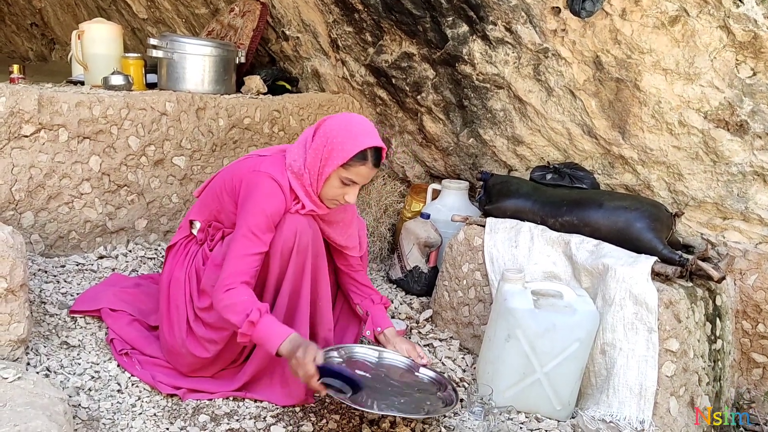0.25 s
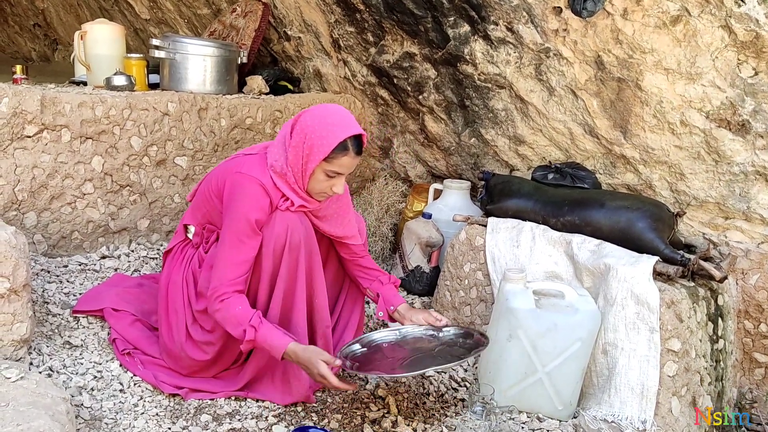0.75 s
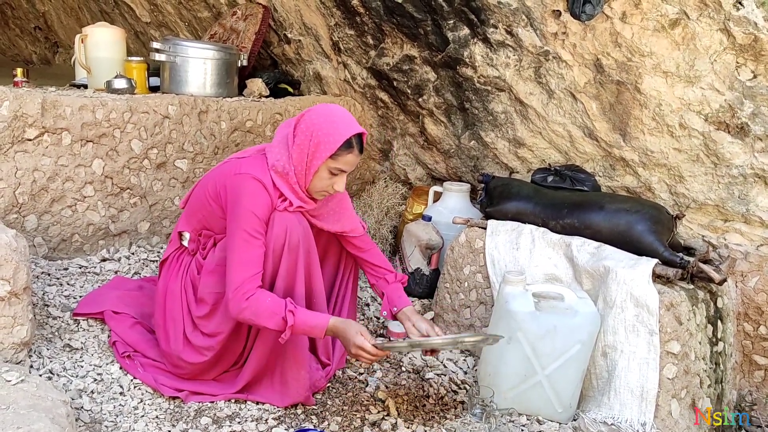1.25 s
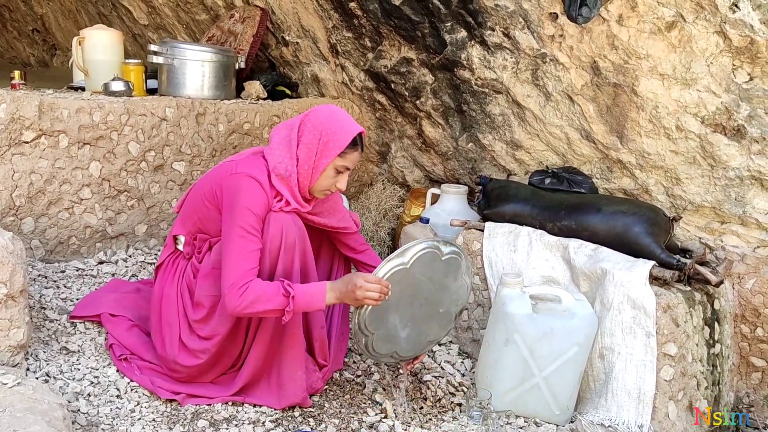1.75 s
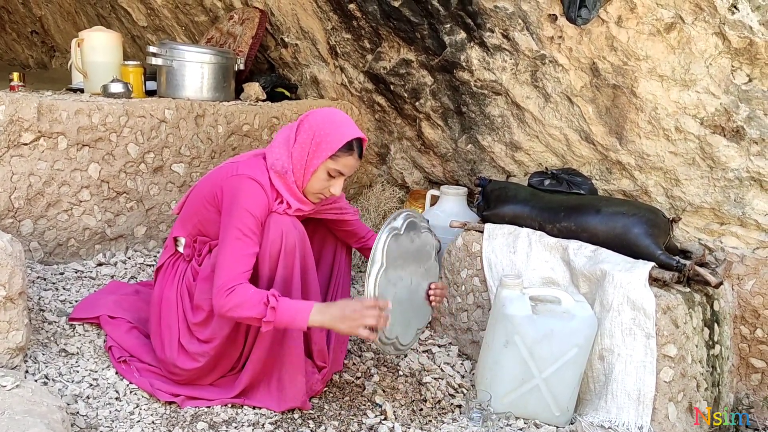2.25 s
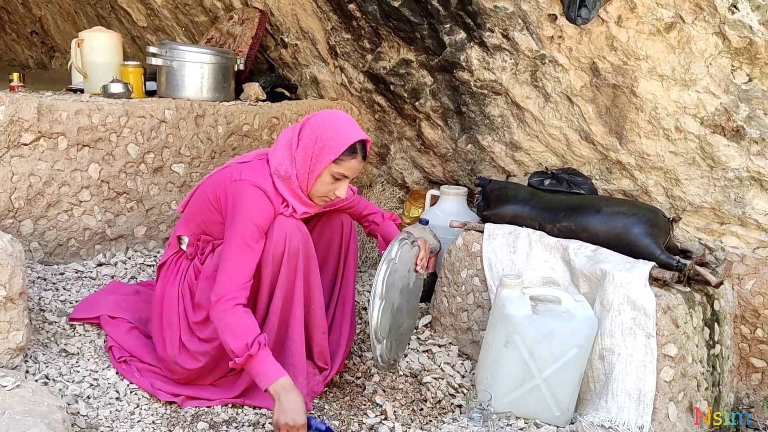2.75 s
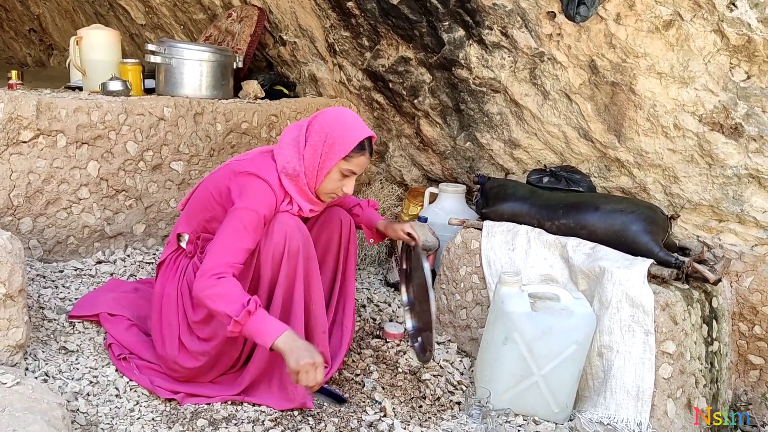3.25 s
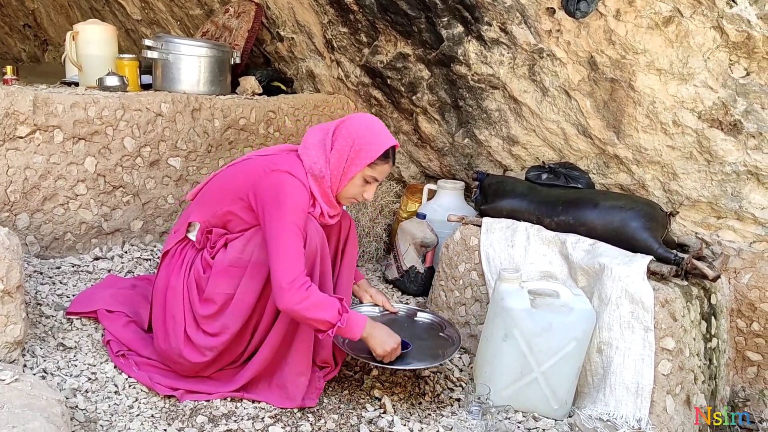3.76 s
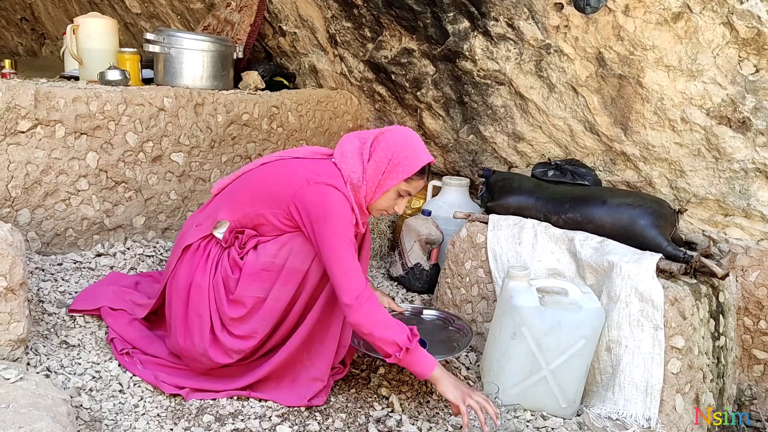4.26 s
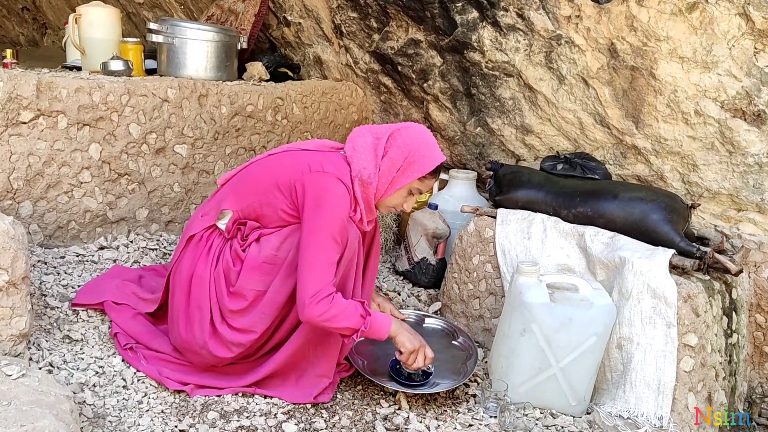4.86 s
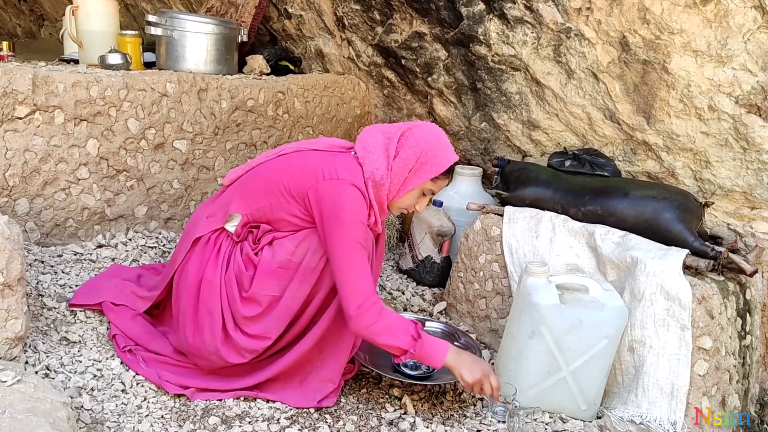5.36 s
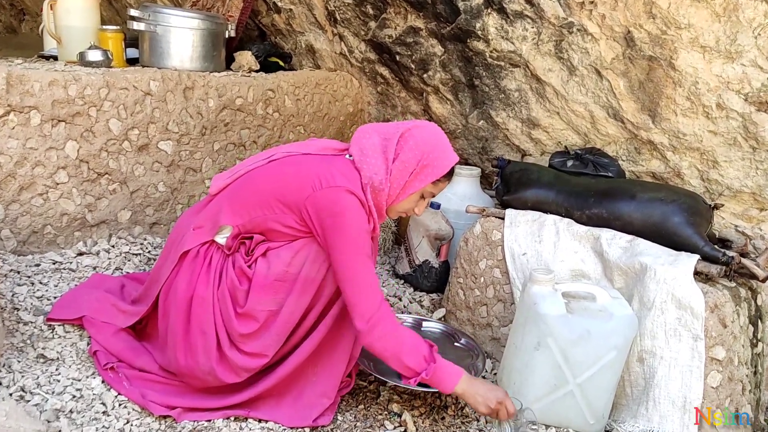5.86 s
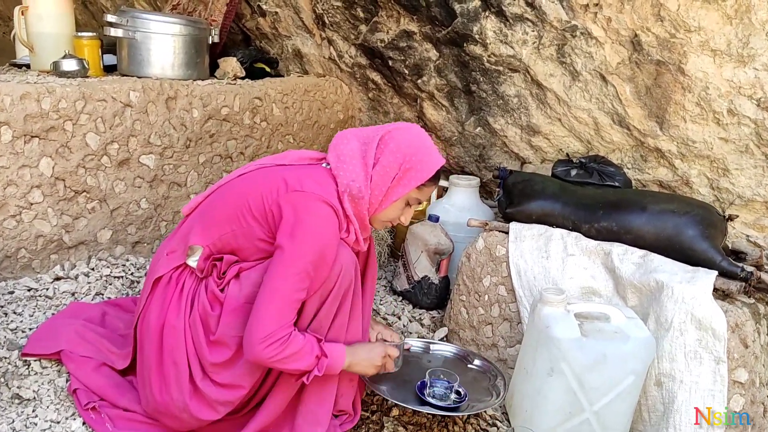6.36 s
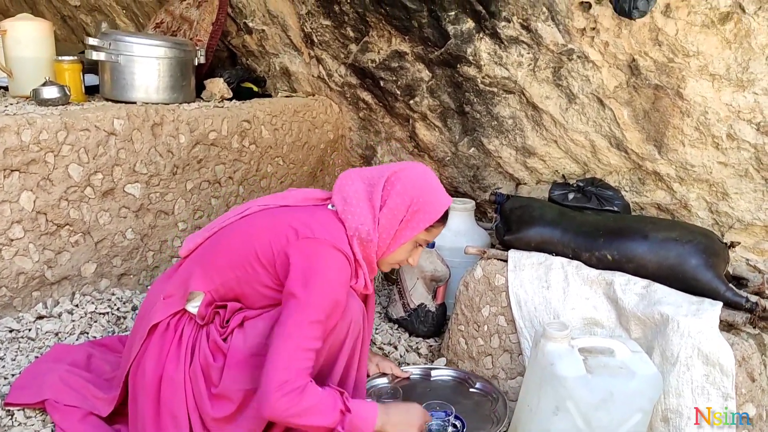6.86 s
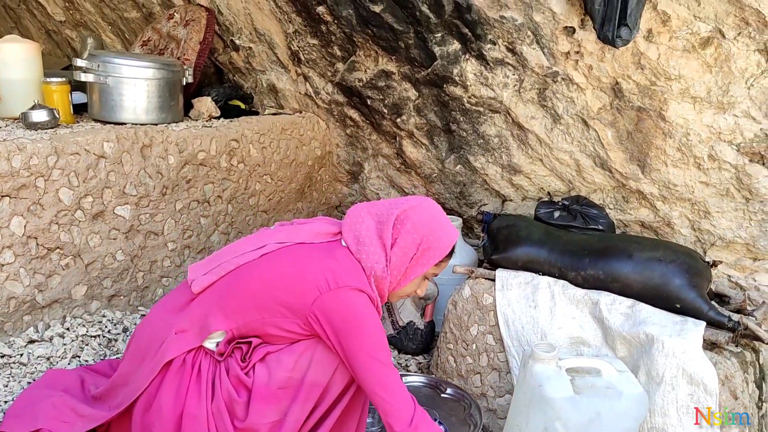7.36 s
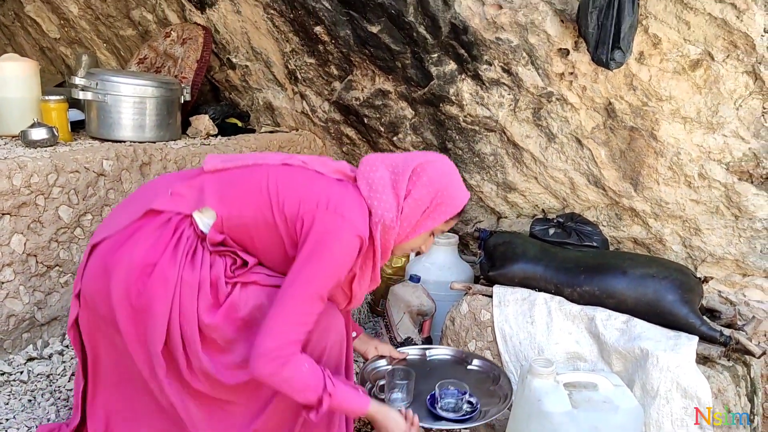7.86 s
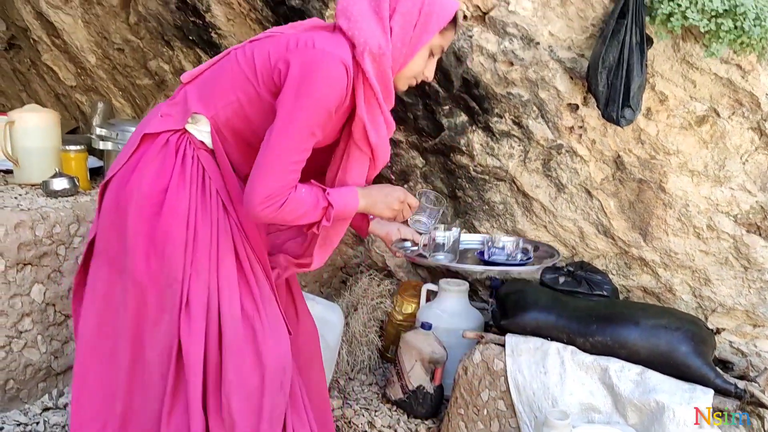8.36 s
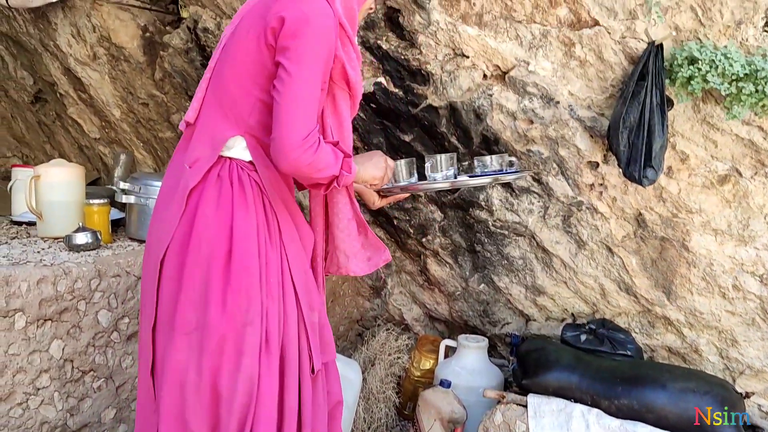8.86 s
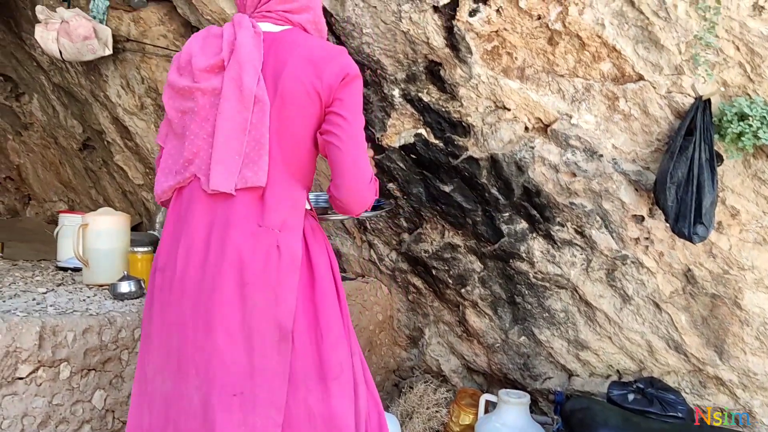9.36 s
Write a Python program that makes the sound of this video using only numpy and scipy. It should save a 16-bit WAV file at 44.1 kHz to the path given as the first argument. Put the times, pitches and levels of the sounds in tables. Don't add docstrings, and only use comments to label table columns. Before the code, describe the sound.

Close stereo microphone outdoors beneath a rock overhang. A saucer scrapes lightly on a thin steel tray, then rinse water patters onto stones. The tray clashes down with a quick rattle, a saucer lands loudly and rings, glasses clink down, gravel crunches underfoot, and the loaded tray jolts as it is lifted. Soft wind and cloth rustle persist underneath.

```python
import sys
import numpy as np
from scipy import signal
from scipy.fft import rfft, irfft, next_fast_len
from scipy.io import wavfile

SR = 44100
rng = np.random.default_rng(int(sys.argv[2]) if len(sys.argv) > 2 else 0)


def output_pcm(signal):
    pcm = np.clip(np.atleast_2d(signal).T, -1, 1) * 32767
    wavfile.write(sys.argv[1], SR, np.round(pcm).astype(np.int16))


def voltage_ratio(decibels):
    exponent = np.asarray(decibels, float) / 20
    return 10 ** exponent


N = 423779
TIME = np.arange(N) / SR
SIDES = np.array([[.5], [-.5]])


def rms_one(x):
    return x / np.sqrt(np.mean(x ** 2) + 1e-20)


def at_hz(points, hz):
    table_hz, values = np.array(points).T
    return np.interp(np.log(hz), np.log(table_hz), values)


def band(x, low_hz, high_hz):
    sos = signal.butter(2, [low_hz, min(high_hz, .45 * SR)], "band", fs=SR, output="sos")
    return signal.sosfilt(sos, x)


def drift(rate, db=None, at=TIME):
    r = np.exp(-80 * np.pi * rate / SR)
    noise = rng.standard_normal(N // 40 + 2002)
    slow = rms_one(signal.lfilter([1], [1, -2 * r, r * r], noise)[2000:])
    values = slow if db is None else voltage_ratio(db * slow)
    return np.interp(at * (SR / 40), np.arange(len(slow)), values)


def grit(share, spread_db):
    sizes = voltage_ratio(spread_db * np.minimum(rng.exponential(1, N), 5)) * (rng.random(N) < share)
    return rms_one(rng.standard_normal((2, N)) * (sizes + 0.56))


def coloured(source, spectrum, patchy_db, likeness):
    size = next_fast_len(N)
    hz = np.arange(size // 2 + 1) * SR / size + 1e-3
    inside = (hz > spectrum[0][0]) * (hz < spectrum[-1][0])
    mid, side = rfft(source.astype(np.float32), size) * (voltage_ratio(at_hz(spectrum, hz)) * inside)
    alike = np.clip(at_hz(likeness, hz), 0, 1)
    pair = np.sqrt(1 + alike) * mid + np.sqrt(1 - alike) * side * [[1], [-1]]
    pair = pair.astype(np.complex64)
    place = (np.log(np.maximum(hz, 120) / 120) / np.log(2.7)).astype(np.float32)
    out = 0
    for centre in range(6):
        part = pair * np.clip(1 - np.abs(place - centre), 0, 1)
        flicker = drift(9, db=patchy_db)
        if part.any():
            out = out + flicker * irfft(part, size)[:, :N]
    return rms_one(out)


def add(out, start_s, sound):
    i = round(start_s * SR)
    out[:, i:i + sound.shape[1]] += sound[:, :N - i]


# frequency in Hz, level in dB per Hz
AIR_COLOUR = [(7.1, -20), (12, 14), (28, -9.5), (59, -13), (128, -19), (342, -24.5), (1460, -30),
              (14900, -41.5)]
# frequency in Hz, left-right likeness
AIR_LIKENESS = [(60, -0.15), (240, 0.87), (930, 0.087), (3660, -0.58), (14400, -0.25)]
# time in seconds, level in dB
GUSTS = [(0, 5), (2.4, 4.5), (4.5, 5.5), (6.3, 6), (7.8, 5.5), (9.6, 8)]


def air():
    still = coloured(rng.standard_normal((2, N)), AIR_COLOUR, patchy_db=2.4, likeness=AIR_LIKENESS)
    wind = signal.lfilter(*signal.butter(1, 110, fs=SR), still)
    gust = voltage_ratio(np.interp(TIME, *np.transpose(GUSTS)))
    return voltage_ratio(-54.5) * (still - wind + gust * wind)


def moves(rows):
    t = TIME[::32]
    power = 0
    for peak_s, db, swell_s, fade_s in rows:
        swings = np.where(t < peak_s, (peak_s - t) / swell_s, (t - peak_s) / fade_s)
        power = power + voltage_ratio(2 * (db - 20 * swings))
    return np.interp(TIME, t, power)


def out_of_step(x):
    turn_hz, alike, hollow = 1800, 0.22, 0.685
    turn = np.tan(np.pi * turn_hz / SR)
    turn = (turn - 1) / (turn + 1)
    x = x - hollow * signal.lfilter(*signal.butter(1, [2900, 3900], "band", fs=SR), x)
    left = signal.lfilter([0, turn, 1], [1, turn], x[0])
    right = alike * x[0] + np.sqrt(1 - alike ** 2) * x[1]
    return np.array([left, right])


# peak in seconds, peak level in dB, swell in seconds per 20 dB, fade in seconds per 20 dB
HANDS = [(.106, -50.5, 0.26, 0.11), (.392, -54, 0.8, 0.2), (.91, -60.5, 0.026, 0.32),
         (2.5, -60.5, 0.031, 1.2), (2.69, -56, 0.28, 0.03), (2.885, -60.5, 0.054, 0.21),
         (3.11, -56, 0.031, 0.11), (3.19, -55.5, 0.1, 0.61), (3.7, -59, 0.74, 9.2),
         (4.404, -55, 0.033, 0.11), (4.62, -58, 0.063, 1.4), (5.62, -55, 1.3, 0.23),
         (5.858, -52, 0.0085, 0.029), (6.27, -75.5, .8, .6), (6.5, -61.5, 0.26, 0.049),
         (7.33, -59, 0.38, 0.33), (7.92, -58, 1.2, 0.36)]
WATER = [
    (1.575, -51.5, 0.049, 0.97),
    (1.72, -43.5, 0.14, 0.24),
    (2.04, -54, 0.016, 0.069),
    (2.33, -65.5, 3, 0.15),
    (2.4, -69, 0.093, .2),
]
FEET = [(7.016, -51.5, 0.098, 1.1), (7.468, -42.5, 0.048, 0.35), (7.708, -41.5, 0.064, 0.062),
        (7.78, -71.5, 0.034, 2.32), (8.3, -45.5, 0.022, 0.15), (8.365, -45.5, 0.068, 0.29),
        (8.46, -57, 0.2, 0.033), (8.6, -75, 0.17, 0.13), (8.888, -57.5, 0.15, 0.14),
        (9.147, -56.5, 0.055, 0.078), (9.25, -57.5, .1, 0.097), (9.3, -66, 0.28, 1.2),
        (9.33, -67, 0.75, 0.15)]
SLOSH = [
    (4.55, -51, 0.012, 0.022),
    (4.71, -54.5, 0.21, 0.13),
    (4.93, -58, 0.24, 0.43),
    (5.4, -61, 0.58, 0.29),
    (6.08, -63, 0.79, 1.6),
    (6.47, -57.5, 0.16, 0.046),
    (8.92, -60, 0.33, 0.091),
    (9.43, -62, 0.43, 0.084),
]
# time in seconds, left-right in dB
PLACE = [(0.0, 3.5), (1.15, 0.5), (1.55, -2.5), (3.15, 3.5), (4.73, 0), (6.42, 0.5), (7.51, 2), (9.6, 1.5)]
# frequency in Hz, level in dB per Hz
HISS = [(1180, -24.5), (2000, -2), (2580, -2.5), (3390, -4), (4830, -1.5), (7100, -0.5), (8100, 0.5),
        (9550, -1.5), (14800, -14)]
# frequency in Hz, left-right likeness
LIKENESS = [(60, 0.33), (180, 0.65), (540, 0.43), (1610, 0.066), (4810, 0.05), (14400, 0.048)]


def rustle():
    hands, water, feet = moves(HANDS), moves(WATER), moves(FEET)
    crunch_power = hands * voltage_ratio(2 * -11.5) + water * voltage_ratio(2 * -15.5) + feet * voltage_ratio(2 * -14)
    body_power = hands * voltage_ratio(2 * -15.5) + water * voltage_ratio(2 * -48) + feet * voltage_ratio(2 * -16)
    body_power = body_power + voltage_ratio(2 * -73)

    hiss = coloured(grit(0.33, spread_db=1.2), HISS, patchy_db=1.45, likeness=LIKENESS)
    crunch = coloured(grit(0.011, spread_db=3.5),
                      [(450, -28.0), (800, -1.5), (1100, -0.2), (2400, -5.5), (3300, -14.5)],
                      patchy_db=2.0, likeness=LIKENESS)
    body = coloured(rng.standard_normal((2, N)), [(90, -25.0), (170, -5.5), (400, -3.5), (800, -16.5)],
                    patchy_db=1.5, likeness=LIKENESS)
    slosh = coloured(rng.standard_normal((2, N)),
                     [(600, -17.5), (850, -5.5), (1050, -10.0), (1400, -13.0), (3600, -24)],
                     patchy_db=3.5, likeness=LIKENESS)

    gravel = np.roll(hiss, SR, axis=1)
    glint = band(gravel, 7400, 10570) * [[0.6], [-1.1]]
    gravel = gravel + voltage_ratio(-6) * glint
    stream = drift(39, db=2) * out_of_step(np.roll(hiss, 2 * SR, axis=1))

    mix = np.sqrt(hands) * hiss + np.sqrt(water) * stream + np.sqrt(feet) * gravel
    mix = mix + np.sqrt(crunch_power) * crunch + np.sqrt(body_power) * body
    mix = mix + np.sqrt(moves(SLOSH)) * slosh
    pan_db = np.interp(TIME, *np.transpose(PLACE))
    return voltage_ratio(3.0 + SIDES * pan_db) * mix


def taps(rows, t60, splash_db, trim_db, width=1.35):
    out, t = np.zeros((2, N)), TIME[:SR // 6]
    for s, db, hz, pan_db in rows:
        puff = rms_one(band(rng.standard_normal((2, SR // 5)), hz / width, hz * width)[:, :len(t)])
        alike = np.clip(1 - hz / 1200, 0, 1) ** .5
        puff[1] += alike * (puff[0] - puff[1])
        shape = voltage_ratio(-60 * t / t60) * (1 - np.exp(-t * hz / 1.1)) ** 2
        ring = np.sin(2 * np.pi * hz * t)
        add(out, s - .0008, voltage_ratio(db + trim_db + SIDES * pan_db) * shape * (ring + voltage_ratio(splash_db) * puff))
    return out


# start in seconds, peak level in dB, centre in Hz, left-right in dB
STEPS = [
    (7.452, -35, 8400, 3),
    (9.133, -48.5, 7090, -2),
    (9.228, -47.5, 8350, -4),
    (9.328, -46.5, 6820, -3),
    (9.393, -50.5, 6500, -4),
]


def steps():
    return taps(STEPS, t60=0.088, splash_db=16.5, trim_db=-16.5)


# start in seconds, peak level in dB, pitch in Hz, left-right in dB
HUMS = [
    (3.862, -30, 251.3, 0),
    (3.965, -35.5, 245.7, 0),
    (5.22, -40, 406, 0),
    (6.60, -33, 165.4, 0),
    (8.66, -37, 380, 1),
]


def hums():
    return taps(HUMS, t60=0.68, splash_db=-29, trim_db=-11.0)


# start in seconds,
# peak level in dB, pitch in Hz, left-right in dB
DROPS_AND_PEBBLES = [(0.5676, -43, 9000, 7), (0.877, -36, 9500, 8), (1.4247, -42, 1270, 12), (1.5487, -32, 2350, -3),
                     (1.581, -27, 5700, -4), (1.7194, -35, 5700, -4), (1.7856, -30, 7660, -10), (1.877, -33, 8850, -1),
                     (1.9043, -30, 10100, 0), (1.9385, -37, 5400, 5), (1.9645, -27.5, 8000, -7),
                     (2.0326, -28.5, 5330, -7), (2.0694, -48, 2150, 0), (2.0857, -46, 2200, -4),
                     (2.2222, -35, 10000, 4), (2.363, -33.5, 4770, -2),
                     (4.303, -34, 1600, -8), (4.439, -32, 2230, -10), (5.57, -33, 6200, 5), (5.593, -46, 9150, 9),
           (5.643, -26.5, 5500, 6), (5.668, -37, 8850, 9), (5.8562, -36.5, 4930, -8),
           (5.926, -32.5, 7060, 2), (5.945, -28, 10000, 6), (5.986, -28, 7550, 4), (6.024, -37, 1280, -7),
           (6.5023, -30.5, 8220, 5), (8.544, -21, 9520, -3.5), (8.564, -27.5, 7800, -3.5),
           (9.0574, -39, 1980, -5), (9.0683, -39.5, 5960, 3), (9.0914, -35.5, 8700, 7),
           (9.12, -34.5, 1840, -2), (9.328, -35, 2130, -10), (9.3937, -32, 1090, 0), (9.422, -26, 1920, -7)]


def drops_and_pebbles():
    return taps(DROPS_AND_PEBBLES, t60=0.01, splash_db=-0.5, trim_db=-6.5, width=1.73)


# start in seconds, peak level in dB, pitch in Hz, left-right in dB
KNOCKS = [
    (1.421, -50.5, 420, -5),
    (4.543, -31.5, 391, 2),
    (5.684, -39.5, 343, 3),
    (4.545, -34, 93, 4),
    (7.883, -47, 127, -2),
    (9.422, -52, 970, 4),
]


def knocks():
    return taps(KNOCKS, t60=0.077, splash_db=-3.5, trim_db=-1.5)


# start in seconds, peak level in dB, pitch in
# Hz, left-right in dB
BUMPS = [(3.859, -37, 657, 1), (3.86, -29.5, 2204, -2), (3.961, -37, 827, 5), (4.0494, -34, 4330, -3),
         (4.40, -52, 187, 0), (5.065, -16.5, 2270, -1), (5.07, -39, 193.6, 0.5), (6.58, -33, 807, -0.5),
         (6.625, -43, 415, -1), (6.783, -37, 276, -3), (6.784, -27, 867, -1), (6.784, -26.5, 3880, -1),
         (6.81, -37.5, 410, -2), (6.87, -38, 237, -2), (7.70, -49, 210, -2), (8.645, -46.5, 616, 2),
         (8.70, -41.5, 201, -1), (8.86, -42, 219, -2), (8.87, -44, 1505, -7.5), (2.085, -50, 2230, 0.5),
         (8.92, -53, 1570, 0), (8.96, -53, 1595, -3), (5.066, -35, 664, -0.5), (5.065, -32, 1610, 5),
         (5.063, -31.5, 12830, 1), (6.585, -48, 380, 0), (8.876, -44, 3830, 2)]


def bumps():
    return taps(BUMPS, t60=0.12, splash_db=2, trim_db=-6.0, width=1.2)


# start in seconds, peak level in dB, centre in Hz, left-right in dB
SCRAPES = [
    (5.086, -24.5, 6500, -2),
    (7.543, -42, 6000, 0),
    (8.832, -48, 3000, -0.5),
    (9.123, -54, 1300, 2),
    (9.222, -60, 1800, 1.5),
    (9.39, -50, 1011, -2),
    (9.424, -55, 1510, -4),
]


def scrapes():
    return taps(SCRAPES, t60=.13, splash_db=24.5, trim_db=-27, width=1.5)


# start in seconds, peak level in dB, pitch in Hz, left-right in dB
TICKS = [(.6125, -35, 8050, 0), (.621, -32, 5700, -2), (.642, -26, 9000, -4), (.649, -30, 5230, -1),
         (.665, -27, 7940, 2), (.701, -33, 5500, -3), (.729, -28.5, 6260, -3), (.912, -43, 11000, 4),
         (1.2843, -42.5, 1110, 1), (1.5676, -48, 7850, -1), (1.6429, -39, 8000, -1),
         (2.0141, -42, 9680, -2), (2.2077, -43, 7650, -3), (2.2535, -42, 7800, -5),
         (2.3189, -47.5, 6740, -10), (2.4825, -44, 8600, 0.5), (6.0224, -48, 9000, -5.5),
         (6.2793, -52.5, 1342, -2), (6.44, -50, 2990, -6), (6.567, -44.5, 7800, -0.5),
         (7.0232, -37, 9290, 8.5), (7.477, -31, 9000, 4.5), (7.555, -36, 6000, 7), (9.022, -50.5, 2750, 0),
         (9.0308, -46, 2030, 1), (9.226, -47, 1990, -4), (9.265, -43, 2200, -5), (9.3091, -47, 5210, -2),
         (9.328, -38.5, 5500, 1), (9.393, -44, 3200, 4), (9.401, -31, 1050, 0), (9.432, -34, 1061, 2),
         (9.5057, -48, 2190, -1.5), (9.5631, -52, 4750, 3), (1.7846, -39, 7900, -4),
         (8.5432, -38, 9550, -1)]


def ticks():
    return taps(TICKS, t60=0.017, splash_db=-2.0, trim_db=-4, width=1.74)


# start in seconds, peak level in dB, pitch in Hz, left-right in dB
TREMBLES = [(5.064, -28, 2160, -4), (5.212, -29, 4740, -3), (5.213, -31.5, 2300, -9),
            (5.249, -32.5, 4840, -6), (5.268, -28, 2390, 1), (5.30, -41, 1197, -12), (6.58, -41.5, 879, -3),
            (6.581, -33, 4600, -4), (6.784, -26.5, 4730, -4), (6.875, -40, 1880, -8), (8.70, -43, 3860, 4),
            (8.82, -54, 1610, -9), (8.878, -50, 3920, 5), (8.89, -46, 1524, -1), (8.945, -52.5, 1330, 0)]
BRUSHES = [
    (2.70, -55, 1830, 6),
    (2.736, -50, 1840, -1),
    (3.27, -56.5, 1800, -11),
]


def trembling_glass():
    return taps(TREMBLES + BRUSHES, t60=0.087, splash_db=-9, trim_db=-1.0)


# start in seconds, peak level in dB, pitch in Hz, left-right in dB
CLINKS = [(3.859, -23.5, 4040, -3), (3.859, -27, 4970, -7), (3.861, -30, 1680, -2), (3.961, -27, 1790, -2),
          (3.972, -29, 4200, 0), (3.973, -25, 7550, 0), (4.07, -32, 4010, -4), (4.078, -35, 1770, -2),
          (5.063, -22, 2940, 4), (5.064, -26, 1002, 5), (5.216, -32.5, 800, 2), (5.317, -39, 1140, 1),
          (6.58, -26.5, 4180, -3.5), (6.581, -29.5, 1910, -2), (6.624, -27.5, 4100, 6),
          (6.625, -28.5, 4660, -4), (6.624, -41, 1880, -5), (6.642, -30, 4680, 0), (6.651, -35, 6040, 0),
          (6.786, -35, 1870, 1), (6.80, -31, 4370, 2), (6.865, -33, 4750, 4), (6.88, -45, 5980, -2),
          (8.643, -29.5, 1615, 6), (8.645, -46, 4900, 0), (8.66, -40, 2550, -2)]


def clinks():
    return taps(CLINKS, t60=0.065, splash_db=-1, trim_db=-3.0, width=1.12)


# start in seconds, level in dB, place on the rim in rad, hardness in dB per mode order
TOUCHES = [(0.593, -47.5, 0.48, -1), (0.621, -57, 1.54, 16.5), (0.6495, -38, 1.46, 1.5),
           (0.6664, -37, 0.46, -3.5), (0.693, -35.5, 0.62, -6.5), (0.699, -44.5, 1.01, -6.5),
           (0.7294, -44, 1.1, -1), (0.7594, -52, 1.17, -11), (0.7994, -58, 1.17, -14),
           (0.844, -63.5, 0.21, 0.5), (0.8714, -78, 0.52, 6), (5.0632, -15.5, 0.83, -5.5),
           (5.075, -16, 0.84, -6.5), (5.084, -22, 0.94, 6), (5.0944, -23.5, 0.53, -12),
           (5.1203, -36, 1.34, -3.5), (5.167, -66, 1.46, 6), (5.215, -36, 0.78, -5.5),
           (5.245, -49, 0.71, -15), (5.2894, -49, 1, -2), (5.3244, -59, 0.36, -8), (5.3714, -76, 1.35, -5)]
SAUCER_HZ = [1857, 3866, 6021, 6106, 8488, 8730, 11240, 12320]
# level in dB, decay factor, left lead in rad, roughness
SAUCER_MODES = [(-18.5, 1.9, .3, 0.93), (0.5, 3.2, 0.99, 0.041), (-7, 1.4, 0.76, 0.29),
                (-2.5, 1.3, 1.6, 0.42), (-4, 0.66, 1.9, 0.7), (-5.5, 1.2, 1, 1.4), (-21.5, 0.15, 1.3, 0.6),
                (-13.5, 0.56, 1.3, 1.8)]
ORDERS = [2, 3, 4, 4, 5, 5, 5, 5]
# time in seconds, loss in dB
GRIP = [(.7, -3.5), (.745, 3), (.82, 29), (5.06, 1), (5.1, 14), (5.3, 7)]


def saucer():
    touches = np.array(TOUCHES)
    start_s, touch_db, rim_rad, hardness = touches.T
    last = np.searchsorted(start_s - .002, TIME) - 1
    age = TIME - start_s[last] + .002
    live = (age > 0) & (age < .2)
    t, age, last = TIME[live], age[live], last[live]
    smooth = np.exp(-1 / (0.0014 * SR))
    out = np.zeros((2, N))
    for hz, (db, factor, lead, rough), order in zip(SAUCER_HZ, SAUCER_MODES, ORDERS):
        reach = np.abs(np.cos(order * rim_rad)) + .05
        struck_db = touch_db + hardness * (order - 3.5) + 20 * np.log10(reach)
        phase = np.cumsum(rng.standard_normal(len(touches)))
        kick = np.exp(1j * (0.34 + rough) * phase)[last]
        rubbing = rough * (drift(70, at=t) + 1j * drift(70, at=t)) / np.sqrt(2)
        choke_db = np.interp(t, *np.transpose(GRIP)) * (order == min(ORDERS))
        decay_db = 60 * age / (factor * 0.4)
        swing = voltage_ratio(struck_db[last] + db - choke_db - decay_db) * (kick + rubbing)
        swing = signal.lfilter([1 - smooth], [1, -smooth], swing)
        out[:, live] += np.real(swing * np.exp(1j * (2 * np.pi * hz * t + SIDES * lead)))
    return out * voltage_ratio(6.5)


# start in seconds, peak level in dB, chatter t60 in seconds, left-right in dB
CLASHES = [
    (3.857, -8, 0.13, 2),
    (3.929, -19.5, 0.086, -1),
    (3.9584, -13.5, 0.15, -3),
    (3.9724, -14, 0.2, 0),
    (4.0493, -21, 0.25, 3),
    (4.0709, -20, 0.18, -3),
    (4.1177, -21.5, 0.099, -1.5),
    (4.1494, -18, 0.024, -1),
]
GLASS_DOWNS = [
    (6.5783, -16.5, 0.14, 0.5),
    (6.6223, -19, 0.35, -1),
    (6.6506, -25, 0.15, 5),
    (6.7004, -23.5, 0.26, 0.5),
    (6.782, -14, 0.12, -1.5),
    (6.8064, -20, 0.39, 0.5),
    (6.8627, -23, 0.21, -3),
    (6.9178, -25, 0.064, 2),
]
JOLTS = [
    (8.6413, -13.5, 0.19, -0.5),
    (8.6778, -21, 0.15, 2),
    (8.8431, -30, 0.11, -0.5),
    (8.8777, -40.5, 0.29, -4),
]
DRAGS = [
    (.594, -41, 0.41, -5),
    (.62, -39, 0.14, 2),
    (.649, -35, 0.15, -3),
    (.664, -32.5, 0.13, 7),
    (.70, -34, 0.076, -1.2),
    (.729, -39, 0.051, 5),
]
SET_DOWNS = [
    (5.062, -5.5, 0.069, -4.5),
    (5.11, -13.5, 0.24, -0.5),
    (5.212, -13, 0.061, -1.5),
    (5.25, -22, 0.14, -4),
    (5.30, -33.5, 0.099, 12),
]
# frequency in Hz, level in dB per Hz
TRAY_COLOUR = [(71, -45), (120, -6), (238, -5.5), (419, 2), (556, -11), (799, -7), (1830, 4.5), (3200, 1.5),
               (4300, 1), (9930, -8), (13700, -25.5), (14900, -42)]
# frequency in Hz, width in Hz, level in dB
TRAY_PEAKS = [(250, 15, -8), (404, 25, -7), (818.6, 110, 6.5), (1730, 39, 5), (4100, 60, 3.5),
              (4790, 50, 1.5)]
# frequency in Hz, width in Hz, share removed
TRAY_HOLLOWS = [(3250, 200, .7), (5500, 250, 0.35)]


def tray():
    t = TIME[:SR // 9]
    hz = 140 + 14500 * ((np.arange(400) + rng.random(400)) / 400) ** 1.6
    level = voltage_ratio(at_hz(TRAY_COLOUR, hz)) * (hz / 1000) ** 0.66
    for peak_hz, width_hz, db in TRAY_PEAKS:
        level *= 1 + voltage_ratio(db - 3.5) / (1 + ((hz - peak_hz) / width_hz) ** 2)
    for hollow_hz, width_hz, share in TRAY_HOLLOWS:
        level *= 1 - share / (1 + ((hz - hollow_hz) / width_hz) ** 2)
    low = hz < 1100
    level /= np.where(low, np.linalg.norm(level[low]), np.linalg.norm(level[~low]))

    t60 = 0.1 * (hz / 2000) ** -.4
    phase = rng.uniform(0, 2 * np.pi, 400)
    lead = np.minimum(hz / 1800, 1.6) * rng.standard_normal(400)
    rings = voltage_ratio(-60 * t / t60[:, None]) / np.sqrt(t60 * SR / 28)[:, None]
    ears = []
    for side in (.6, -.6):
        angle = 2 * np.pi * hz[:, None] * t + (phase + side * lead)[:, None]
        ears.append(rings * np.sin(angle.astype(np.float32)))

    out, contacts, span = np.zeros((2, N)), grit(.1, spread_db=3.0)[0], TIME[:SR // 3]
    kinds = [(CLASHES, -21, 1.26), (GLASS_DOWNS, -21.5, -1), (JOLTS, -22.5, -0.35),
             (DRAGS, -32, 1.4), (SET_DOWNS, -23, -0.46)]
    for rows, boom_db, bright_db in kinds:
        for s, db, chatter_s, pan_db in rows:
            chatter = voltage_ratio(-60 * span / chatter_s)
            crack = 0.31 * np.exp(-span / 0.0016)
            rattle = 0.05 * voltage_ratio(-24 * span / chatter_s)
            i = round(s * SR)
            force = contacts[i:i + len(span)] * (chatter + crack + rattle) * (1 - np.exp(-span / 0.0011))
            low_db = boom_db + 9.0 - 0.96 * max(db + 9.5, 0)
            tilt_db = np.where(low, low_db, bright_db * np.log2(hz / 3500))
            spot = rng.standard_normal(400)
            drive = level * voltage_ratio(tilt_db + 1.2 * np.abs(spot)) * np.sign(spot)
            body = np.array([drive @ ear for ear in ears])
            sound = signal.fftconvolve(force[None], body, axes=1)
            add(out, s - .002, voltage_ratio(db - 12.0 + SIDES * pan_db) * sound)
    return out


def rock(x):
    t = TIME[:SR // 3]
    wash = band(rng.standard_normal((2, len(t))), 200, 6400) * voltage_ratio(-60 * t / 0.31) * (t > .004)
    return signal.fftconvolve(x, wash / np.sqrt(np.sum(wash ** 2) / 2), axes=1)[:, :N]


def scene():
    ground = air() + rustle() + steps() + hums()
    hits = drops_and_pebbles() + knocks() + bumps() + scrapes() + ticks()
    hits = hits + trembling_glass() + clinks() + tray()
    ring = saucer()
    return hits + ring + voltage_ratio(-16) * rock(hits + .5 * ring) + ground


# frequency in Hz, left-right in dB
PORTS = [(600, -0.5), (1800, -4.5), (3300, 1), (5300, -3), (7000, 1), (8800, 7.5), (10000, 2), (13000, 5)]


def ports(x):
    size = next_fast_len(N)
    hz = np.arange(size // 2 + 1) * SR / size + 1
    return irfft(rfft(x, size) * voltage_ratio(SIDES * at_hz(PORTS, hz)), size)[:, :N]


def band_limit(x):
    return signal.sosfilt(signal.butter(12, 15100, fs=SR, output="sos"), x)


def record(dry):
    heard = ports(dry)
    rounded = heard / (1 + (heard / .76) ** 6) ** (1 / 6)
    mix = signal.sosfilt(signal.cheby2(10, 50, 15250, fs=SR, output="sos"), rounded)
    mix = signal.lfilter(*signal.butter(1, 21, "high", fs=SR), mix)
    return band_limit(mix)


dry = scene()
out = record(dry)
output_pcm(out)
```